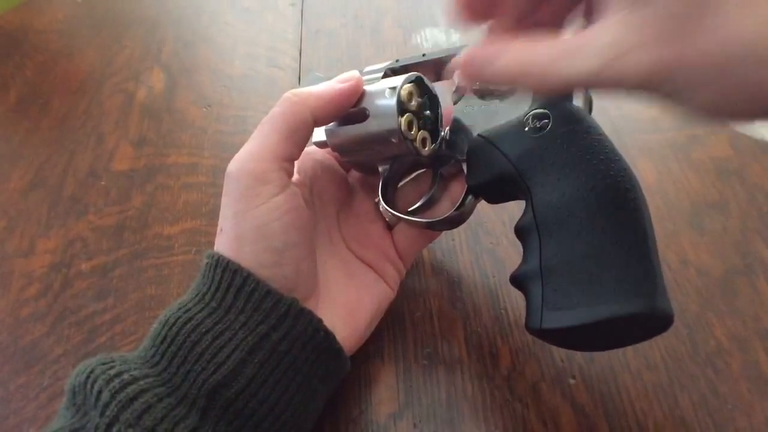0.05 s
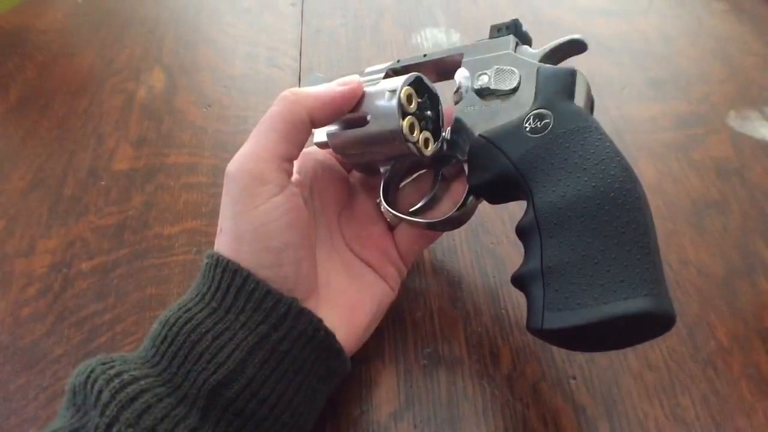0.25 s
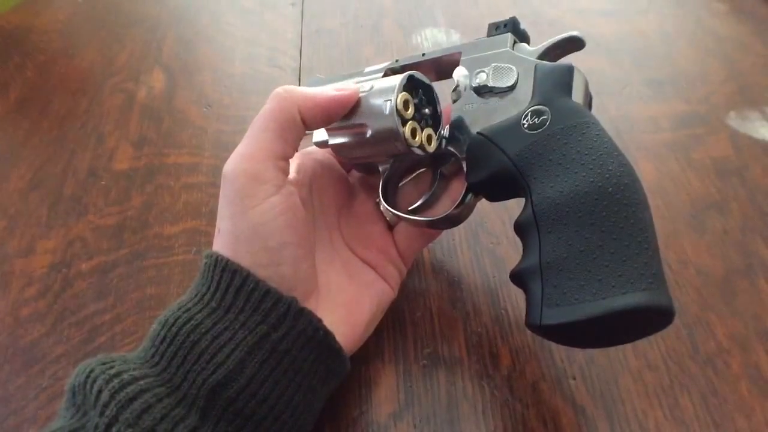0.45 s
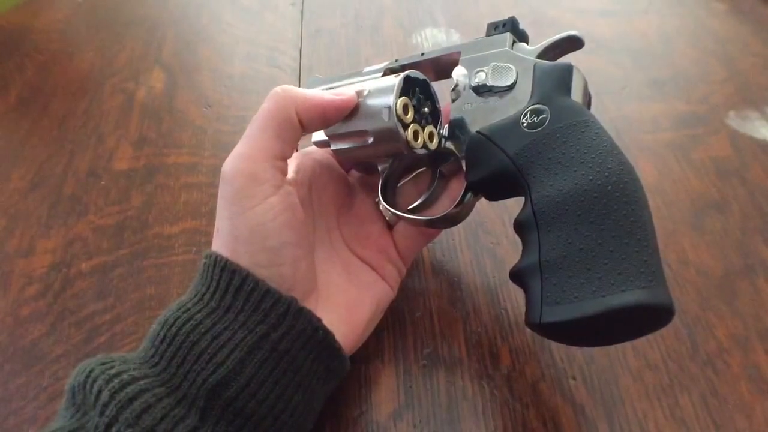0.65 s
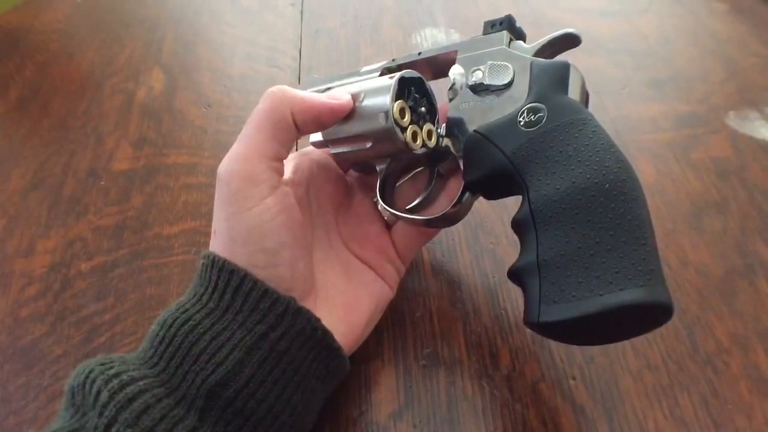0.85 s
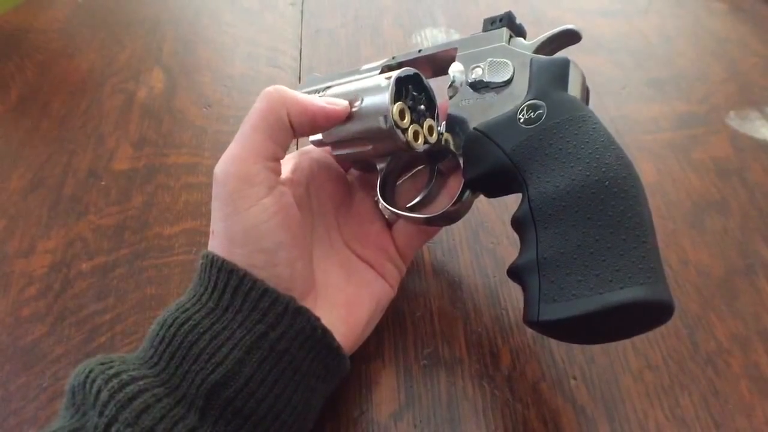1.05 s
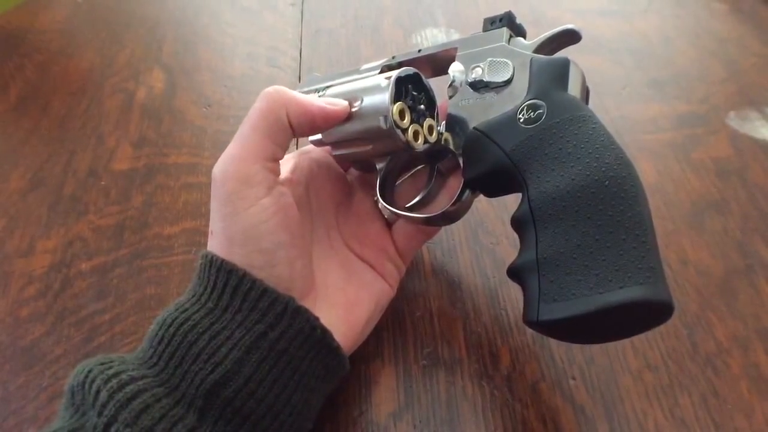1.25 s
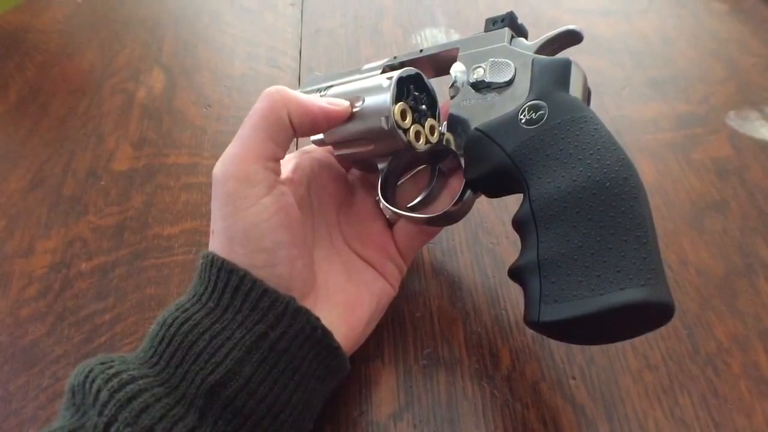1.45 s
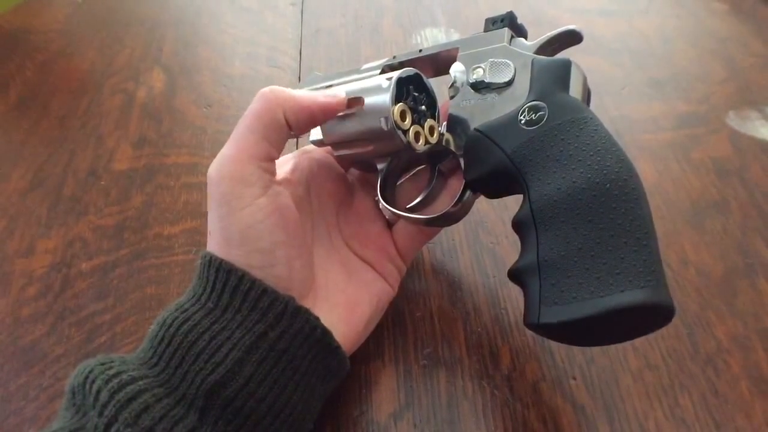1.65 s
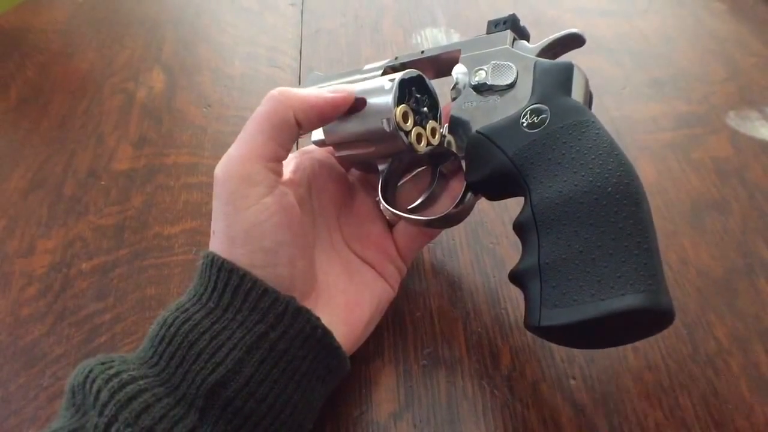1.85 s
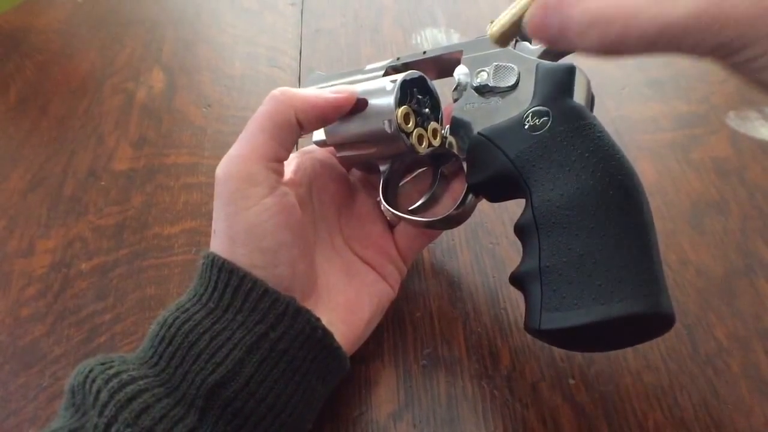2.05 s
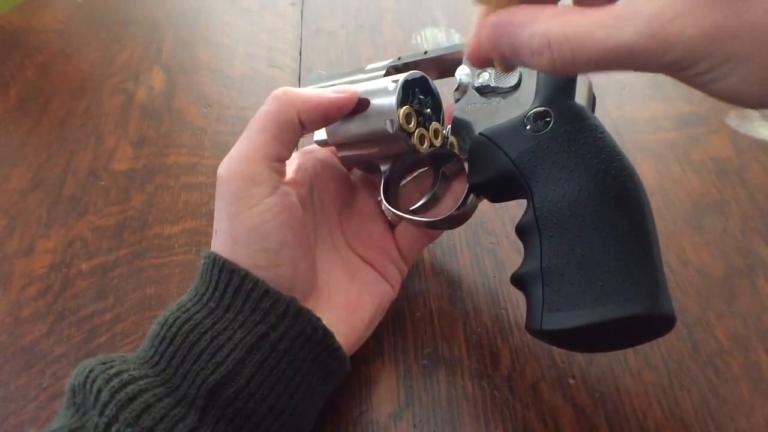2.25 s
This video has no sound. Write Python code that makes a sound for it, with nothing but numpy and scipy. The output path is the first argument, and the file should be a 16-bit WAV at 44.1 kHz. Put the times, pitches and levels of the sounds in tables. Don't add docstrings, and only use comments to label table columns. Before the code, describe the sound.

Close up indoors, a metal shell slides and snaps into a hand-held steel revolver straight away; after a quiet gap, loose shells tick lightly together on a wooden table, with soft low bumps and faint room hush.

```python
import sys
import numpy as np
from scipy import signal
from scipy.io import wavfile
from scipy.ndimage import uniform_filter1d

SR = 44100
rng = np.random.default_rng(int(sys.argv[2]) if len(sys.argv) > 2 else 0)


def digitize_waveform(pressure):
    field = np.atleast_2d(pressure).T
    bounded = np.clip(field, -1, 1)
    quanta = np.round(bounded * 32767).astype(np.int16)
    wavfile.write(sys.argv[1], SR, quanta)


def boost_factor(decibels):
    exponent = np.asarray(decibels, float) / 20
    return 10 ** exponent


N = 101429

# t/s, level/dB
SCRAPE_PRESSURE = [
    (0, -47.5),
    (.008, -42),
    (.025, -42.5),
    (0.038, -40),
    (.048, -49.5),
    (.07, -45),
    (.1, -49),
    (.13, -49.5),
    (.142, -42),
]
# f/Hz, width/Hz, level/dB
WALL_MODES = [(904, 32, -2), (1270, 46, -5.5), (1516, 47.3, 0), (2260, 60, -1.5), (2740, 49, -0.5),
              (3930, 120, -0.5), (5000, 170, -7), (5770, 350, -18)]
# f/Hz, level/dB, t60/s
SHELL_MODES = [(12425, -13.5, .05), (12537, -4, .12), (12685, -14, .05), (15370, 0, .04), (15270, -14, .08),
               (15680, -25, .05)]
# f/Hz, density/dB per Hz
HUSH_SPECTRUM = [(18, -29), (30, 0.5), (75, -7.5), (187, -2.5), (277, -9.5), (390, -12), (520, -17.5),
                 (1480, -18.5), (15600, -38)]
# f/Hz, width/Hz, level/dB
STANDING_WAVES = [(45, 12, -75), (67.05, 12, -73.5), (125, 25, -66), (170, 30, -70), (240, 40, -74),
                  (370, 60, -77.5), (1099, 600, -72.5)]
# t/s, level/dB, f/Hz, length/s
TABLE_THUDS = [(0.006, -49.5, 133, 0.042), (.2, -46.5, 131.4, 0.085), (.545, -44.5, 125, 0.029),
               (.785, -55.5, 429.4, .02), (.82, -47.5, 120, 0.047), (.865, -47, 190, 0.034),
               (1.07, -52, 250, .06), (1.095, -44, 130, .06), (1.135, -49.5, 413, 0.017),
               (1.152, -41, 175, 0.032), (1.165, -33, 120, 0.057), (1.25, -49, 260.6, 0.028),
               (1.298, -44, 112.5, 0.039), (1.437, -41.5, 137.4, 0.03), (1.962, -47, 130, 0.044),
               (2.14, -45.5, 134, 0.14), (2.18, -43.5, 209, 0.023)]
# t/s, frame level/dB, knock colour f/Hz, shell level/dB, upper over lower ring/dB
SHELL_KNOCKS = [(0.0159, -37, 2600, -62, 0.5), (.030, -52.5, 3900, -53, 8),
                (.045, -52.5, 11000, -66.5, -0.5), (0.0526, -27, 4200, -49.5, 5),
                (.0578, -52, 4000, -38.5, -14.5), (.0682, -48.5, 4000, -62.5, -0.5),
                (0.0905, -44, 2800, -62.5, -1), (.099, -40.5, 4000, -65.5, -0.5),
                (0.141, -29.5, 2500, -66.5, -0.5), (0.1426, -17, 2600, -49.5, 0),
                (0.1438, -20.5, 4800, -12.5, 1.5), (.1455, -26.5, 1800, -59.5, -0.5),
                (.1475, -27, 1200, -59.5, -0.5), (.150, -23, 3000, -58.5, -0.5),
                (.153, -31.5, 3500, -61, 0.5), (.156, -33, 1600, -60.5, -0.5),
                (.171, -42, 2300, -60.5, -0.5)]
# f/Hz, level/dB, t60/s
FRAME_MODES = [(400, -2.5, 0.02), (680, -4, 0.021), (1280, -10, .015), (1583, -6.5, 0.021), (1900, -5, .01),
               (2330, -5, 0.013), (2780, 0, .008), (3400, -5.5, .007), (3870, -1.5, .008),
               (5030, -0.5, 0.011), (5350, -8.5, .006), (8910, -5.5, .004), (10300, -3, .004),
               (11600, -10, .004)]
# t/s, level/dB, pitch factor
SHELL_TICKS = [(1.1324, -51.5, 1.01), (1.2416, -30, 0.95), (1.2467, -41, 0.89), (1.2507, -31, .99),
               (1.2543, -35, 0.84), (1.255, -47, 0.92), (1.2584, -44, 0.98), (1.2665, -61, 0.76),
               (1.276, -51, 0.85), (1.2987, -47, 1.09), (1.3945, -60, 0.83), (1.4003, -45, 1.05),
               (1.607, -57, 0.99)]
# f/Hz, level/dB, t60/s
TICK_MODES = [(2600, -15.5, 0.0071), (3600, -10.5, .004), (4400, -5.5, 0.0067), (5040, 3, 0.008),
              (5270, -12.5, 0.012), (8900, -6.5, 0.0032), (10600, -38, .003), (13000, -8, 0.0038),
              (15000, -16, 0.0037)]
# f/Hz, t60/s
ROOM_DECAY = [(300, 0.11), (1200, 0.46), (2500, 0.38), (5000, 0.28), (8000, 0.23), (13000, 0.27)]

SLIPS_PER_S, SCRAPE_RING_DB, SCRAPE_GAIN = 2480, -15, 3.9
HUSH_DB, PATCH_DB = -61, 1.5
THUD_DB, THUD_EDGE_DB, THUD_OVERTONE_DB = -7, -26, -18.5
COLOUR_DB_PER_OCT2, FRAME_DETUNE, FRAME_LOW_CUT_HZ = -3.5, .04, 490
RING_RISE_S, RING_FREE_S, STOP_DB, STOP_S = .0006, .0095, -13, .003
TICK_DB, TICK_DETUNE = -2, .023
ROOM_GAP_S, ROOM_RISE_S, EARLY_DB, EARLY_S = .003, .015, -3.5, .008
NEAR_WET_DB, FAR_WET_DB, RING_WET_DB = -14, -4.5, -19
EDGE_HZ = 15950


def evened(x):
    return x / np.sqrt(np.mean(x ** 2) + 1e-20)


def read(points, hz):
    f, value = np.transpose(points)
    return np.interp(np.log(hz + 1), np.log(f + 1), value)


def add(mix, start_s, sound):
    part = mix[max(round(start_s * SR), 0):][:len(sound)]
    part += sound[:len(part)]


def modes(table, pitch=1, lift_db=0, detune=0, rise_s=.0001):
    t = np.arange(SR // 4)[:, None] / SR
    shift = 1 + detune * rng.standard_normal(len(table))
    hz, db, t60_s = np.transpose(table)
    decay = boost_factor(db + lift_db - 60 * t / t60_s)
    ring = decay * np.sin(2 * np.pi * hz * pitch * shift * t)
    return ring.sum(axis=1) * (1 - np.exp(-t[:, 0] / rise_s))


def resonate(x, hz, width_hz):
    carrier = np.exp(2j * np.pi * hz * np.arange(len(x)) / SR)
    r = np.exp(-np.pi * width_hz / SR)
    return 2 * (carrier * signal.lfilter([1 - r], [1, -r], x / carrier)).real


def scrape():
    n = round(SCRAPE_PRESSURE[-1][0] * SR)
    slips = (rng.random(n) < SLIPS_PER_S / SR) * rng.choice([-1., 1.], n)
    pressure = boost_factor(np.interp(np.arange(n) / SR, *np.transpose(SCRAPE_PRESSURE)))
    force = np.zeros(SR // 2)
    force[:n] = evened(slips) * pressure
    wall = np.zeros(len(force))
    for k, (hz, width_hz, db) in enumerate(WALL_MODES):
        wall += (-1) ** k * boost_factor(db) * resonate(force, hz, 150 + 3 * width_hz)
    ring = sum(resonate(force, hz, 150.35) for hz, _, _ in SHELL_MODES)
    out = np.zeros(N)
    add(out, 0, SCRAPE_GAIN * (wall + boost_factor(SCRAPE_RING_DB) * ring))
    return out


def hush():
    frames, hz = N // 256 + 5, np.fft.rfftfreq(1024, 1 / SR)
    real, imag, patches = rng.standard_normal((frames, 513, 3)).T
    patches = uniform_filter1d(patches, size=10, axis=0)
    patches = evened(uniform_filter1d(patches, size=12, axis=1))
    level_db = read(HUSH_SPECTRUM, hz)[:, None] + PATCH_DB * patches
    noise = signal.istft((real + 1j * imag) * boost_factor(level_db), nperseg=1024, noverlap=768)[1][:N]
    air, booms = rng.standard_normal(N), np.zeros(N)
    for f, width_hz, db in STANDING_WAVES:
        booms += boost_factor(db) * evened(resonate(resonate(air, f, width_hz), f, width_hz))
    return boost_factor(HUSH_DB) * evened(noise) + booms


def thuds():
    out = np.zeros(N)
    for s, db, hz, length_s in TABLE_THUDS:
        t = np.arange(-length_s, length_s, 1 / SR)
        phase = 2 * np.pi * (hz * t + rng.random())
        swing = np.sin(phase) + boost_factor(THUD_OVERTONE_DB) * np.sin(2 * phase)
        add(out, s - length_s, boost_factor(db + THUD_DB + THUD_EDGE_DB * (t / length_s) ** 2) * swing)
    return out


def knocks():
    frame, shell, t = np.zeros(N), np.zeros(N), np.arange(SR // 4) / SR
    stop = boost_factor(STOP_DB * np.clip((t - RING_FREE_S) / STOP_S, 0, 1))
    frame_hz, shell_hz = np.array(FRAME_MODES)[:, 0], np.array(SHELL_MODES)[:, 0]
    upper = shell_hz > np.mean(shell_hz)
    for s, knock_db, colour_hz, ring_db, upper_db in SHELL_KNOCKS:
        colour_db = COLOUR_DB_PER_OCT2 * np.log2(frame_hz / colour_hz) ** 2
        knock = modes(FRAME_MODES, lift_db=colour_db, detune=FRAME_DETUNE)
        ring = modes(SHELL_MODES, lift_db=upper_db * upper, rise_s=RING_RISE_S)
        add(frame, s, boost_factor(knock_db) * knock)
        add(shell, s, boost_factor(ring_db) * stop * ring)
    low_cut = signal.butter(2, FRAME_LOW_CUT_HZ, "high", fs=SR, output="sos")
    return signal.sosfilt(low_cut, frame), shell


def ticks():
    out = np.zeros(N)
    for s, db, pitch in SHELL_TICKS:
        add(out, s, boost_factor(db + TICK_DB) * modes(TICK_MODES, pitch, detune=TICK_DETUNE))
    return out


def room(x):
    taps = np.zeros(SR // 2)
    at = np.arange(0, SR // 2 - 20, 20)
    taps[at + rng.integers(0, 20, len(at))] = rng.choice([-1., 1.], len(at))
    s = np.arange(len(taps)) / SR
    build_up = np.clip((s - ROOM_GAP_S) / ROOM_RISE_S, 0, 1)
    taps *= build_up + boost_factor(EARLY_DB - 20 * s / EARLY_S)
    hz, t, z = signal.stft(taps, SR, nperseg=256)
    decay = boost_factor(-60 * t / read(ROOM_DECAY, hz)[:, None])
    tail = signal.istft(z * decay, SR, nperseg=256)[1]
    return signal.fftconvolve(x, tail / np.linalg.norm(tail))[:N]


def scene():
    frame, shell = knocks()
    near, far = scrape() + frame, ticks()
    wet = room(boost_factor(NEAR_WET_DB) * near + boost_factor(RING_WET_DB) * shell + boost_factor(FAR_WET_DB) * far)
    return (near + shell + far + wet + thuds() + hush())[None]


def band_limit(x):
    return signal.sosfilt(signal.butter(12, 17080, fs=SR, output="sos"), x)


def record(dry):
    low_pass = signal.firwin(191, EDGE_HZ, fs=SR)[None]
    mix = signal.oaconvolve(dry, low_pass, "same")
    return band_limit(mix)


dry = scene()
out = record(dry)
digitize_waveform(out)
```